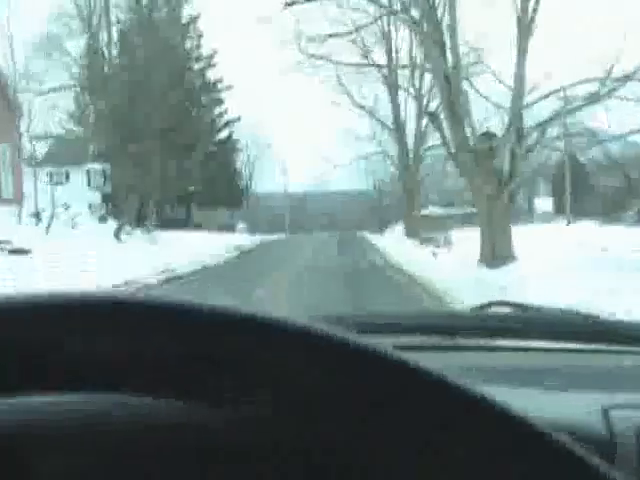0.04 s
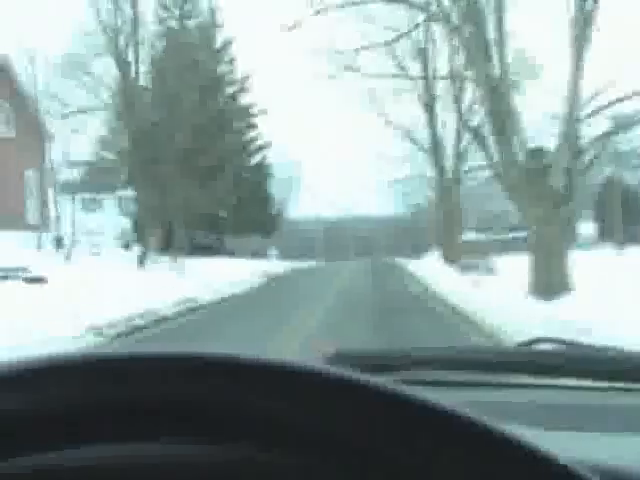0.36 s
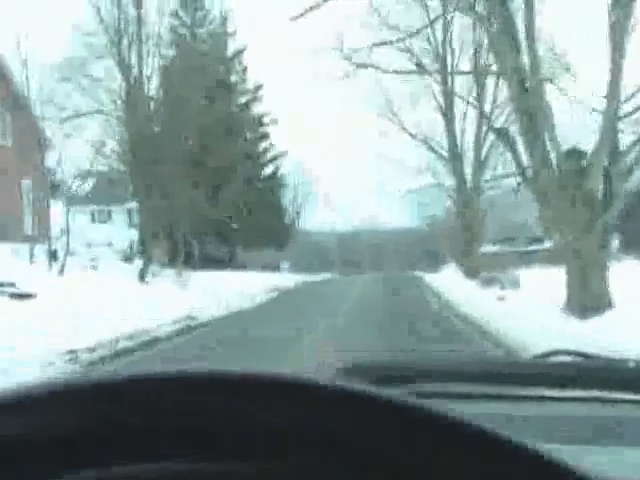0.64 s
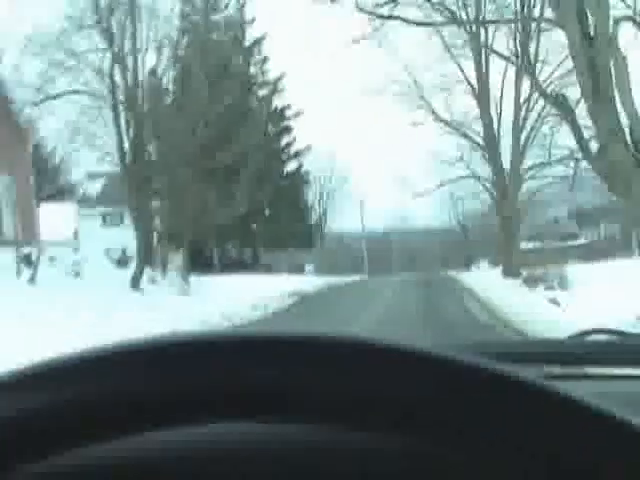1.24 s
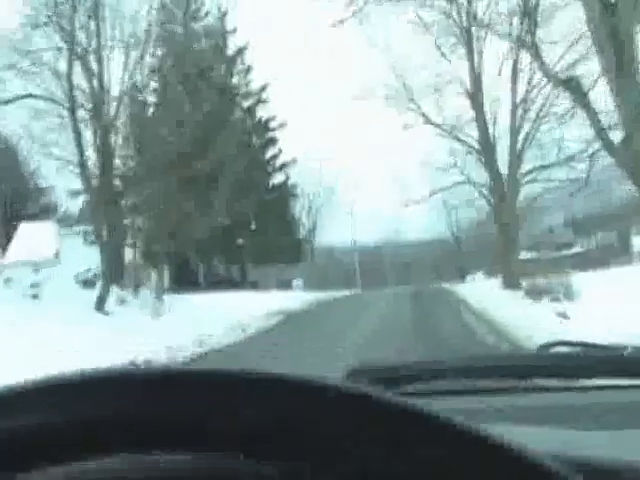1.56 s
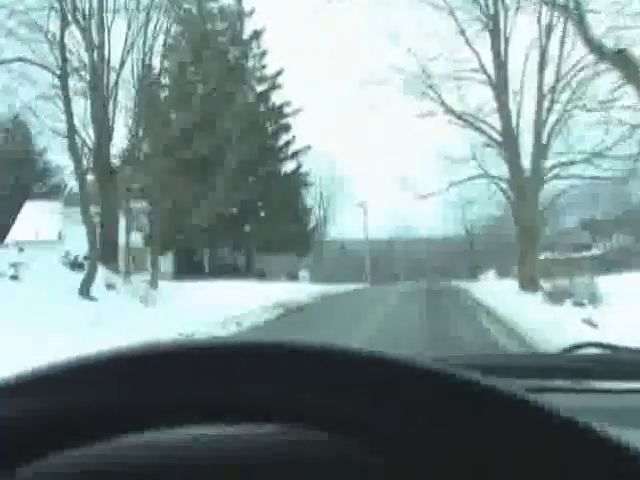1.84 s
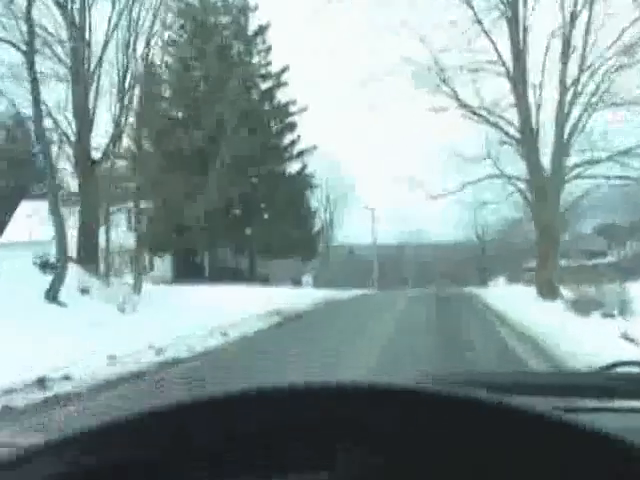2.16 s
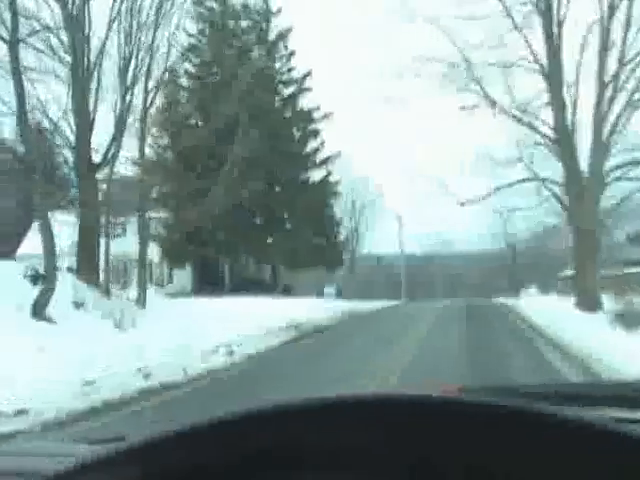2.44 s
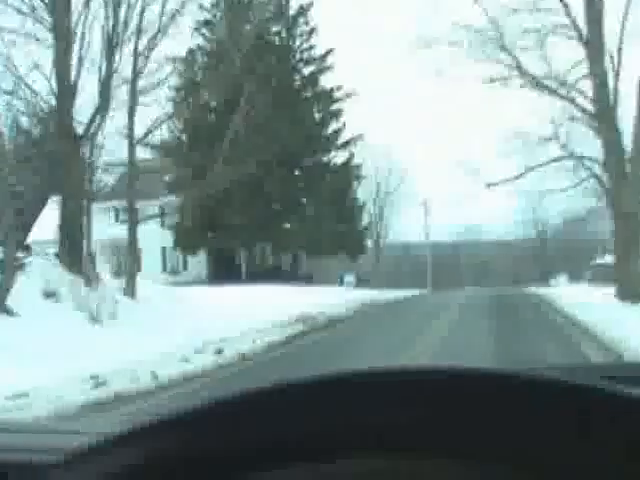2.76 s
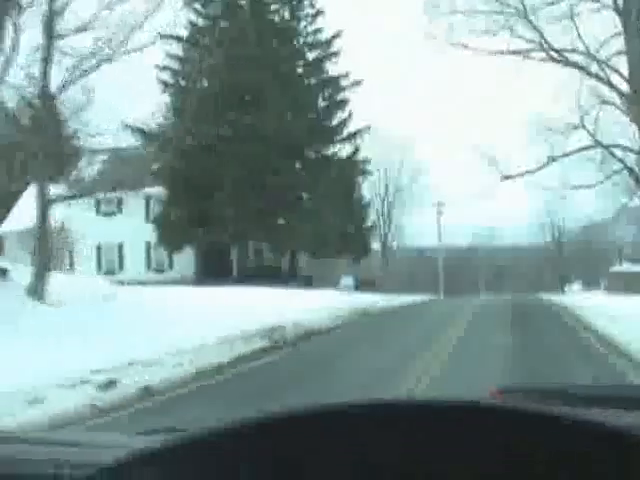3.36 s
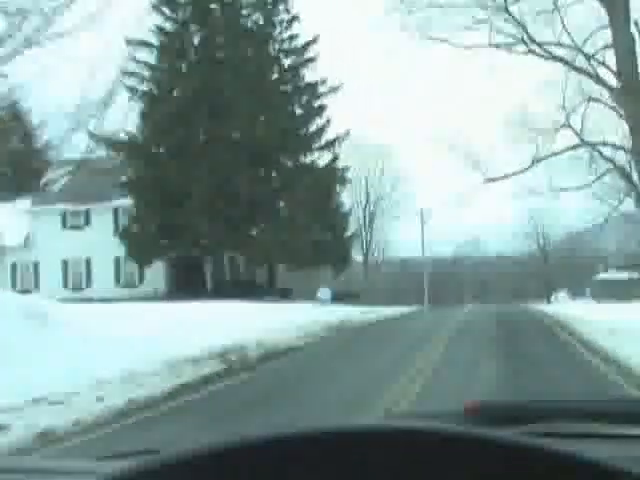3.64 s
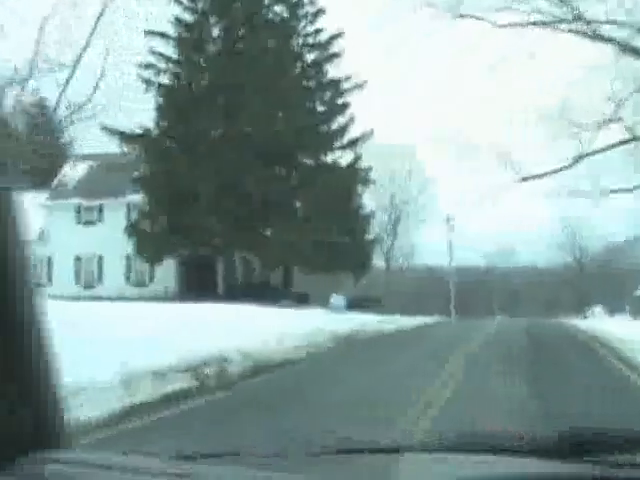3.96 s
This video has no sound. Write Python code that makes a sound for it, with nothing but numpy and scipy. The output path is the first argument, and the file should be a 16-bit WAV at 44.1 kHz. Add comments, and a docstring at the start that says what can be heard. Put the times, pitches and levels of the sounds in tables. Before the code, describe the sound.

Low road rumble fills the cabin of a moving car, with a gently climbing engine hum and a few faint plastic rattles. Near the end the hum fades under a deeper boom and small knocks, all heard from behind the wheel.

```python
"""Inside a six-cylinder car that gathers speed on a winter road.
From the start the engine hums in slowly climbing harmonics over the boom of the body and the roar
of the tyres. Loose plastic trim chatters and squeaks by friction, then ticks by impact, and near 1 s
a small bump knocks in the dashboard. After 2 s coarser asphalt makes the cabin drone; then the
throttle lifts, more knocks follow, and the engine fades under the growing boom."""
import sys
import numpy as np
from scipy import signal
from scipy.fft import rfft, irfft
from scipy.io import wavfile
from scipy.ndimage import uniform_filter1d

SR = 44100
rng = np.random.default_rng(int(sys.argv[2]) if len(sys.argv) > 2 else 0)


def pcm_store(signal):
    """Save signal as 16-bit PCM."""
    levels = np.round(np.clip(np.atleast_2d(signal), -1, 1) * 32767)
    wavfile.write(sys.argv[1], SR, levels.astype(np.int16).T)


N = 176400
T = np.arange(N) / SR


def amp(db):
    """Amplitude ratio of a level in decibels."""
    return 10 ** (np.asarray(db) / 20)


def unit(x):
    """Normalisation to rms 1."""
    return x / np.sqrt(np.mean(x ** 2) + 1e-20)


def gain_at(spectrum, hz):
    """Gain of a spectrum, its levels interpolated over log frequency."""
    f, db = np.transpose(spectrum)
    return amp(np.interp(np.log(hz + 1), np.log(f + 1), db))


def curves(table):
    """Linear interpolation of each column of a time table."""
    times, *columns = np.transpose(table)
    return [np.interp(T, times, column) for column in columns]


def add(mix, start, sound):
    """Superposition of a sound on the mix, from a start in seconds."""
    part = mix[max(round(start * SR), 0):][:len(sound)]
    part += sound[:len(part)]


def drift(hz):
    """Random modulation: low-passed noise of rms 1."""
    f = np.fft.rfftfreq(N, 1 / SR)
    return unit(irfft(rfft(rng.standard_normal(N)) * np.exp(-(f / hz) ** 2), N))


def colour(x, spectrum, size=4096):
    """Minimum-phase filtering with the given spectrum and unit energy."""
    log_gain = np.log(gain_at(spectrum, abs(np.fft.fftfreq(size, 1 / SR))))
    response = np.exp(np.conj(signal.hilbert(log_gain)))
    taps = np.fft.ifft(response).real[:size // 2]
    return signal.oaconvolve(x, taps / np.linalg.norm(taps))[:len(x)]


def noise(spectrum):
    """Stationary noise of rms 1, shaped in frequency."""
    gain = gain_at(spectrum, np.fft.rfftfreq(N, 1 / SR))
    return unit(irfft(rfft(rng.standard_normal(N)) * gain, N))


# Each row: time in seconds, crankshaft speed in turns per second.
CRANK_SPEED = [(0, 34.7), (.2, 34.5), (1, 36.7), (1.5, 38.1), (2.3, 39.9), (2.8, 40.8), (3.25, 41.8),
               (4, 42)]
# Each row: time in seconds, level in dB that stands for the engine load.
ENGINE_LOAD = [(0, -21), (.4, -21.5), (.85, -21.5), (1.55, -24.5), (2.1, -26.5), (2.4, -23.5), (2.6, -30.5),
               (2.95, -29.5), (3.17, -21.5), (3.4, -37), (4, -36)]
# Each row: multiple of the crankshaft speed, relative level in dB, share of the load changes (0-1).
CRANK_ORDERS = [(2, -2.5, 0.16), (3, -1.5, 0.94), (4, -10, 0.04), (5, -15, 0.2), (6, -21.5, 0.1),
                (7, -18, .5), (8, -23.5, 0.4)]

def engine(reference_db=-30, cabin_hz=257.3, bandwidth_hz=30, resonance_db=6):
    """Harmonic series of the crankshaft: six cylinders fire three times a turn, giving order 3."""
    speed, level_db = curves(CRANK_SPEED)[0], curves(ENGINE_LOAD)[0]
    jitter = 1 + .008 * drift(hz=14)  # uneven firing
    angle = 2 * np.pi * np.cumsum(speed * jitter) / SR
    lift_db = -7 * np.clip((T - 2.68) / .22, 0, 1)  # the throttle lifts at 2.68 s
    out = np.zeros(N)
    for order, db, share in CRANK_ORDERS:
        load_db = share * (level_db - reference_db) + (1 - share) * lift_db
        # A cabin resonance reinforces each order that climbs through it.
        detuning = 2 * (order * speed - cabin_hz) / bandwidth_hz
        boost_db = resonance_db / (1 + detuning ** 2)
        waver_db = 1.85 * drift(hz=10)
        gain = amp(reference_db + db + boost_db + load_db + waver_db)
        out += np.sqrt(2) * gain * np.sin(order * angle + 2 * np.pi * rng.random())
    return out


def steadied(x, seconds):
    """Division by the running rms evens out the chance swells of narrow-band noise."""
    return x / np.sqrt(uniform_filter1d(x ** 2, int(seconds * SR)) + 1e-9)


def uneven_asphalt(x, depth_db=.56, patch_s=.06, patch_hz=400):
    """Uneven asphalt modulates the level in small patches of time and frequency."""
    f, t, spectra = signal.stft(x, SR, nperseg=512)
    patches = uniform_filter1d(rng.standard_normal(spectra.shape), round(patch_hz / f[1]), axis=0)
    patches = unit(uniform_filter1d(patches, round(patch_s / t[1]), axis=1))
    return unit(signal.istft(spectra * amp(depth_db * patches), SR)[1][:N])


def cabin_reflections(x, decay_s=.0034, db=-12):
    """Interference with early reflections off glass and panels ripples the spectrum above the bass."""
    t = T[:SR // 10]
    taps = rng.standard_normal(len(t)) * np.exp(-t / decay_s) * (t > .001)
    taps = signal.sosfilt(signal.butter(2, 700, "high", fs=SR, output="sos"), taps)
    reflected = signal.oaconvolve(x, taps / np.linalg.norm(taps))[:N]
    return (x + amp(db) * reflected) / np.hypot(1, amp(db))


# Each row: time in seconds, then levels in dB of body boom, tyre rumble, tyre roar and hiss.
ROAD_LEVELS = [(0, -23.5, -26.5, -38, -57.5), (.6, -23.5, -27.5, -36.5, -53), (1.2, -24.5, -23.5, -37, -53),
               (1.7, -24.5, -24, -35.5, -52), (2.2, -22.5, -24.5, -35.5, -51.5),
               (2.55, -25, -25, -35, -51.5), (2.85, -20.5, -22, -34.5, -50.5),
               (3.1, -17.5, -24.5, -34, -50), (3.35, -20.5, -22, -35, -50), (3.6, -15.5, -25, -34, -49.5),
               (3.8, -16.5, -23, -33.5, -52), (4, -22, -20.5, -32.5, -50)]
# Each row: time in seconds, level in dB of the cabin's drone on coarse asphalt.
DRONE_LEVELS = [(0, -55), (1.8, -55.5), (2.5, -36.5), (3.2, -41), (3.6, -38.5), (4, -46)]
# The spectra of these five noises. Each row: frequency in Hz, relative spectral density in dB.
BOOM_SPECTRUM = [(8, -30.5), (17, -19), (25, -5.5), (35, 0), (42, -3), (52, -13), (70, -27.5), (140, -57.5),
                 (400, -84)]
RUMBLE_SPECTRUM = [(20, -19), (45, -4), (58, -3.5), (90, -3.5), (118, 4.5), (138, 1), (162, -0.5),
                   (183, 0.5), (215, -7), (280, -7), (340, -13), (450, -21), (900, -53.5), (3000, -88.5)]
ROAR_SPECTRUM = [(100, -21.5), (300, -2.5), (400, 0), (500, -1.5), (590, 0.5), (730, -6.5), (850, -3.5),
                 (1030, -7), (1170, -7.5), (1400, -7.5), (1900, -15.5), (2800, -22), (4000, -35),
                 (10000, -53.5)]
HISS_SPECTRUM = [(500, -10.5), (2000, 5), (3000, 4.5), (4000, 2.5), (4800, 1.5), (6300, -4), (8200, -6),
                 (9300, -13), (10500, -31)]
DRONE_SPECTRUM = [(150, -32), (340, -4.5), (400, -6.5), (490, -1.5), (585, -2), (700, -9), (830, -8),
                  (1200, -26), (3000, -60)]

def road():
    """Forced random vibration: the road shakes body and tyres, while air and tread add a thin hiss."""
    boom_db, rumble_db, roar_db, hiss_db = curves(ROAD_LEVELS)
    flutter_db = .85 * drift(hz=47)
    boom = amp(boom_db) * steadied(noise(BOOM_SPECTRUM), seconds=.33)
    rumble = amp(rumble_db) * steadied(noise(RUMBLE_SPECTRUM), seconds=.18)
    roar = amp(roar_db + flutter_db) * uneven_asphalt(noise(ROAR_SPECTRUM))
    hiss = amp(hiss_db + flutter_db) * uneven_asphalt(noise(HISS_SPECTRUM))
    drone = amp(curves(DRONE_LEVELS)[0]) * noise(DRONE_SPECTRUM)
    return boom + rumble + drone + cabin_reflections(roar + hiss)


# Response of the trim, in jiggles and ticks alike. Each row: frequency in Hz, relative gain in dB.
TRIM_SPECTRUM = [(800, -28), (2800, -15), (3900, -1.5), (4450, -4), (5330, 6), (5850, 4.5), (6400, 3.5),
                 (7500, -5), (8400, -3.5), (9100, -8.5), (10500, -16.5)]

def trim_jiggle(per_second=19, spread_db=4.5, decay_s=.01, under_hiss_db=13.5):
    """A Poisson process of tiny trim impacts, whose level follows the road hiss."""
    hiss_db = curves(ROAD_LEVELS)[3]
    sizes = amp(spread_db * np.minimum(rng.exponential(1, N), 3))
    impacts = sizes * (rng.random(N) < per_second / SR)
    envelope = signal.lfilter([1], [1, -np.exp(-1 / (decay_s * SR))], impacts)
    bursts = envelope * rng.standard_normal(N)
    return amp(hiss_db - under_hiss_db) * unit(colour(bursts, TRIM_SPECTRUM))


# Each row: start in seconds, level in dB, decay time in seconds, centre in Hz, width in octaves.
PANEL_SLIPS = [(.005, -45.5, 0.23, 2650, 0.71), (.028, -48, 0.018, 6900, 0.32),
               (0.128, -50.5, 0.014, 6400, 0.46), (0.6, -50, .025, 5000, 0.54),
               (.835, -51.5, 0.11, 5400, .6), (.994, -37.5, 0.0028, 4200, .9),
               (1.845, -46, 0.023, 5170, .36), (2.532, -49, 0.015, 6500, 0.72),
               (2.95, -43, 0.027, 4200, 0.71), (3.163, -42.5, 0.01, 3000, 0.5),
               (3.172, -51, 0.015, 8000, .3), (3.198, -38, 0.01, 7160, 0.31),
               (3.216, -44, 0.017, 3020, 0.16), (3.46, -35.5, 0.0053, 4800, 0.64),
               (3.598, -41.5, 0.017, 7400, 0.19), (3.599, -40.5, 0.0072, 4000, 0.5),
               (3.624, -48, .01, 7150, 0.31), (3.723, -44.5, .015, 2950, 0.61)]

def panel_chatter(rise_s=.00067):
    """Sliding friction between panels radiates decaying bursts of band-limited noise."""
    out, t = np.zeros(N), T[:SR // 2]
    f = np.fft.rfftfreq(len(t), 1 / SR)
    for start, db, decay, hz, octaves in PANEL_SLIPS:
        band = 1 / (1 + .5 * (np.log2((f + 1) / hz) / octaves) ** 2) ** 2
        friction = unit(irfft(rfft(rng.standard_normal(len(t))) * band, len(t)))
        envelope = np.minimum(t / rise_s, 1) * np.exp(-t / decay)
        add(out, start, amp(db) * friction * envelope)
    return out


# Each row: start in seconds, level in dB, length in seconds, pitch in Hz.
PLASTIC_SQUEAKS = [(0.114, -53, .017, 5230), (0.118, -50, 0.025, 2570)]

def plastic_squeaks(waver=.02):
    """Stick-slip oscillation of plastic on plastic: a nearly steady tone that swells and stops."""
    out = np.zeros(N)
    for start, db, length, hz in PLASTIC_SQUEAKS:
        t = T[T < length]
        cycles = np.cumsum(hz * (1 + waver * drift(hz=400)[:len(t)])) / SR
        swell = np.sin(np.pi * t / length)
        add(out, start, amp(db) * unit(swell * np.sin(2 * np.pi * cycles)))
    return out


# Each row: start in seconds, level in dB, rebound delay in seconds, rebound in dB relative to the tap.
TRIM_TAPS = [(.575, -39, .004, -10), (.8047, -28, .003, -9), (0.8803, -31, 0.0032, -5),
             (1.148, -43, 0.0027, 2), (1.191, -25, 0.0021, -5), (1.222, -36, 0.0032, -4),
             (1.324, -25.5, 0.0032, 2.5), (1.335, -32, 0.0046, 2), (1.8385, -27.5, .003, -8),
             (2.427, -39, 0.0044, -4), (2.783, -25, 0.0033, -6), (3.096, -34, .004, -6)]

def trim_ticks(decay_s=.00073, tail_s=.01, tail_db=-15):
    """Impact and rebound: loose plastic strikes twice, and the padded cabin soon absorbs the sound."""
    out, t = np.zeros(N), T[:SR // 10]
    envelope = np.exp(-t / decay_s) + amp(tail_db) * np.exp(-t / tail_s)
    for start, db, delay, rebound_db in TRIM_TAPS:
        tap, rebound = .5 * envelope * rng.standard_normal((2, len(t)))
        add(out, start, amp(db) * tap)
        add(out, start + delay, amp(db + rebound_db) * rebound)
    return colour(out, TRIM_SPECTRUM)


# Each row: start in seconds, level in dB, decay time in seconds, panel resonance in Hz.
BUMPS = [(.994, -34, 0.008, 1700), (2.728, -29.5, 0.011, 1670), (2.955, -27.5, 0.0065, 1700),
         (3.172, -30, 0.0077, 800), (3.184, -29.5, 0.046, 587), (3.255, -29.5, 0.0074, 1840),
         (3.287, -31.5, 0.023, 595), (3.6, -26, 0.01, 644)]
# Response of the dashboard. Each row: frequency in Hz, relative gain in dB.
DASHBOARD_SPECTRUM = [(150, -27), (400, 2), (600, 2.5), (800, 1), (1200, -5), (1900, -15), (2500, -19.5),
                      (3200, -12.5), (5000, -20), (10000, -34)]

def dashboard_knocks(rise_s=.002, ring_db=3, q=2.3):
    """Heavily damped resonance: each small bump excites a dull thud and one panel of the dashboard."""
    out, t = np.zeros(N), T[:SR // 5]
    for start, db, decay, hz in BUMPS:
        thud, shake = rng.standard_normal((2, len(t)))
        panel = signal.iirpeak(hz, q, SR)
        ring = unit(signal.lfilter(*panel, signal.lfilter(*panel, shake)))
        knock = unit(colour(thud, DASHBOARD_SPECTRUM) + amp(ring_db) * ring)
        envelope = np.minimum(t / rise_s, 1) * np.exp(-t / decay)
        add(out, start, amp(db) * knock * envelope)
    return out


def scene():
    """Superposition of all sources at the driver's seat, in one channel."""
    continuous = engine() + road() + trim_jiggle()
    return (continuous + panel_chatter() + plastic_squeaks() + trim_ticks() + dashboard_knocks())[None]


def record(dry):
    """Band limiting: a steep low-pass filter removes the treble above 10450 Hz."""
    taps = signal.firwin(401, 10450, window=("kaiser", 9), fs=SR)
    return signal.oaconvolve(dry, taps[None], "same")


dry = scene()
out = record(dry)
pcm_store(out)
```